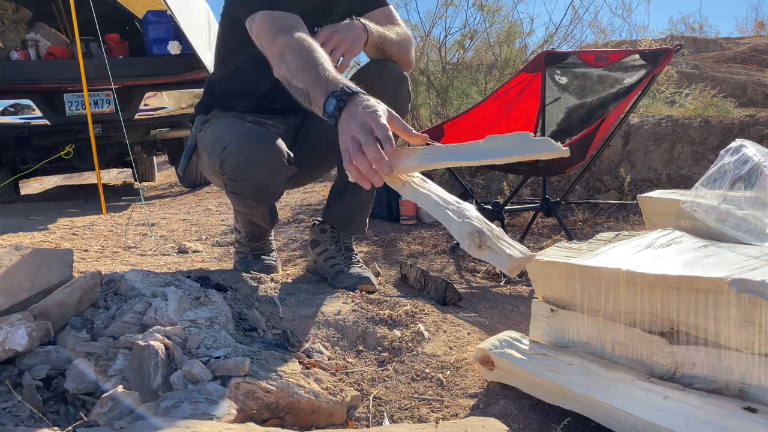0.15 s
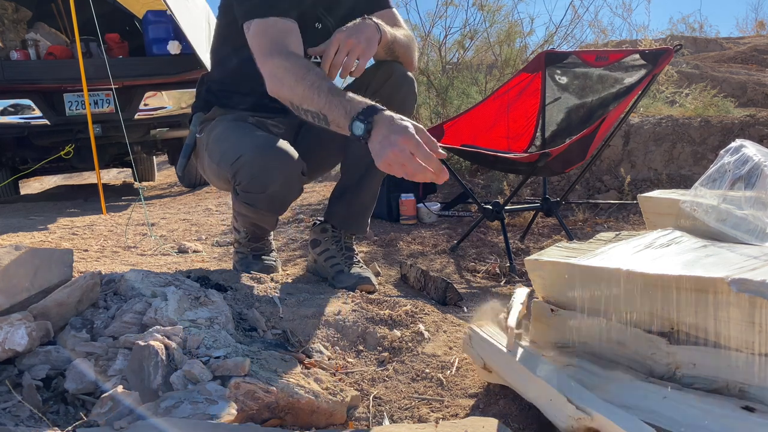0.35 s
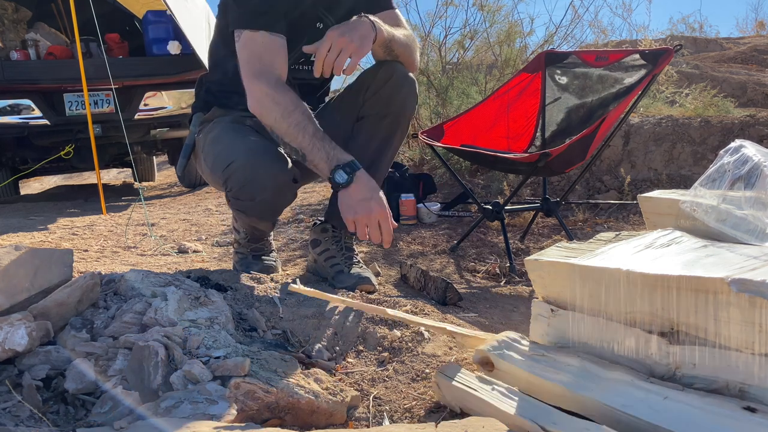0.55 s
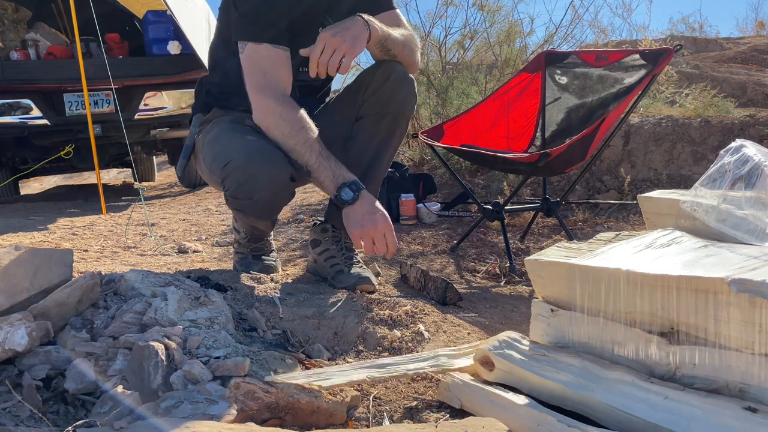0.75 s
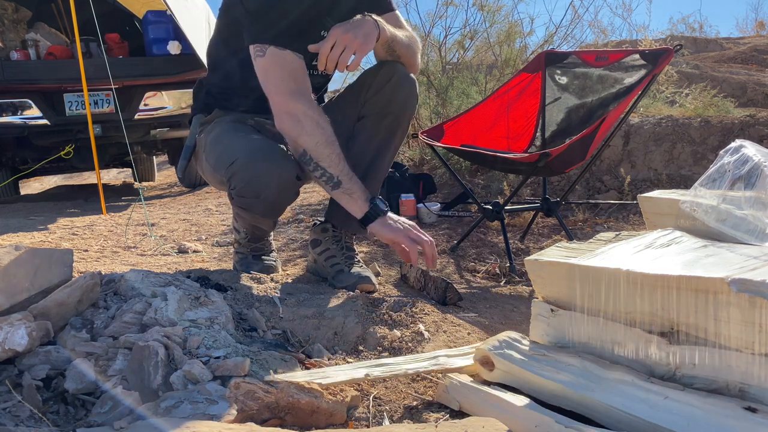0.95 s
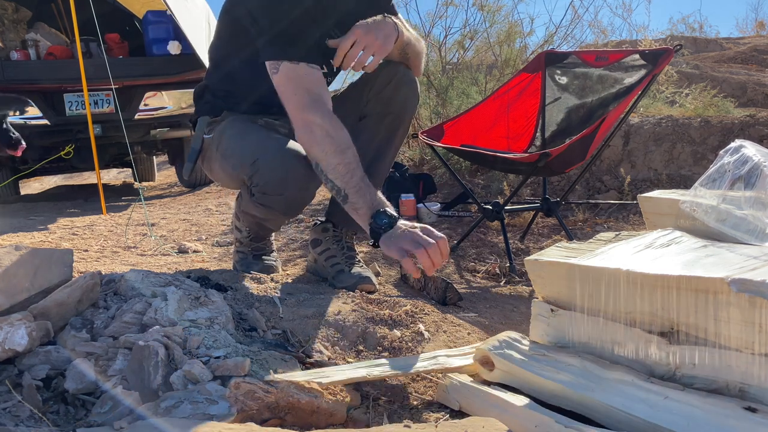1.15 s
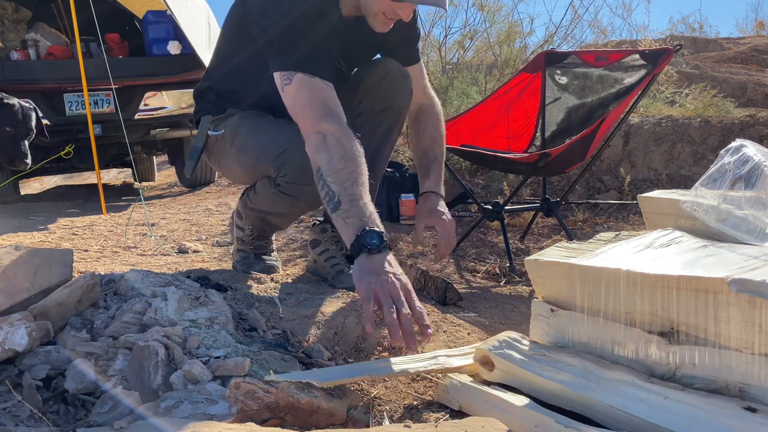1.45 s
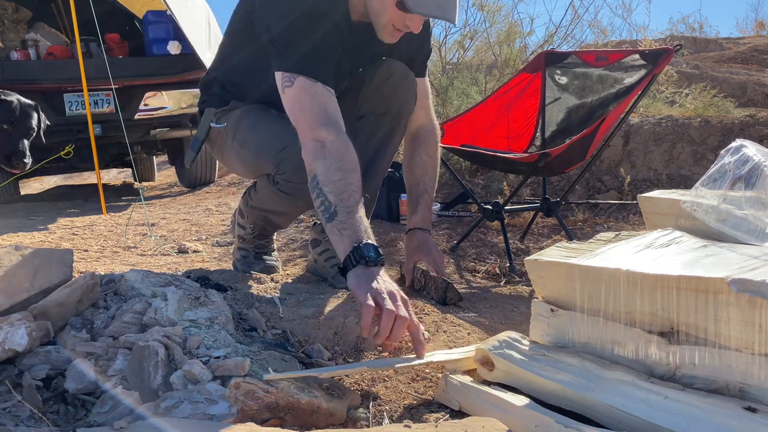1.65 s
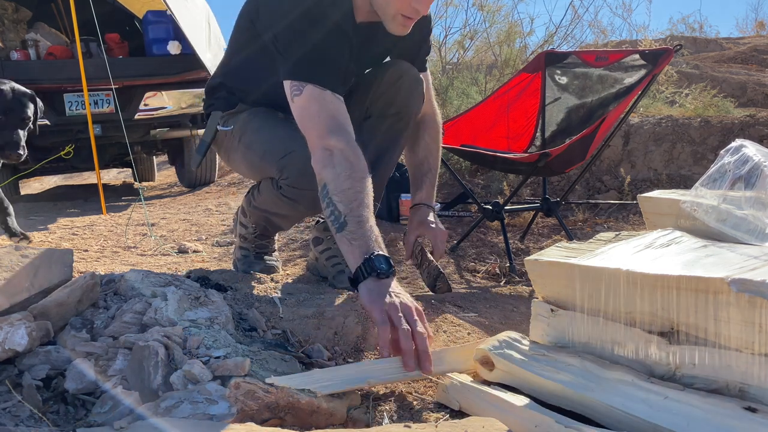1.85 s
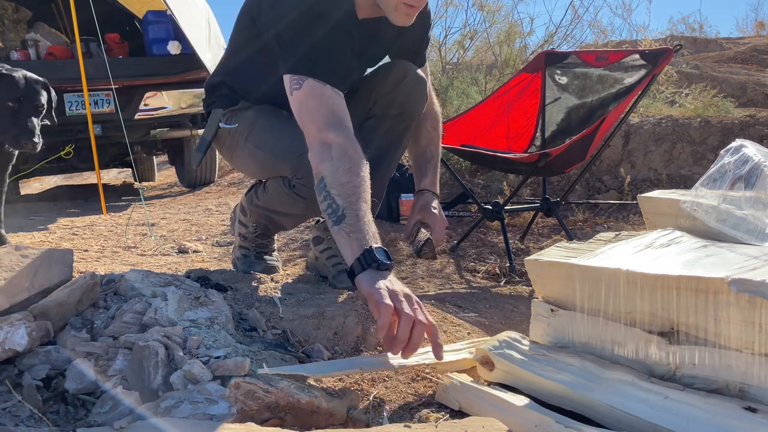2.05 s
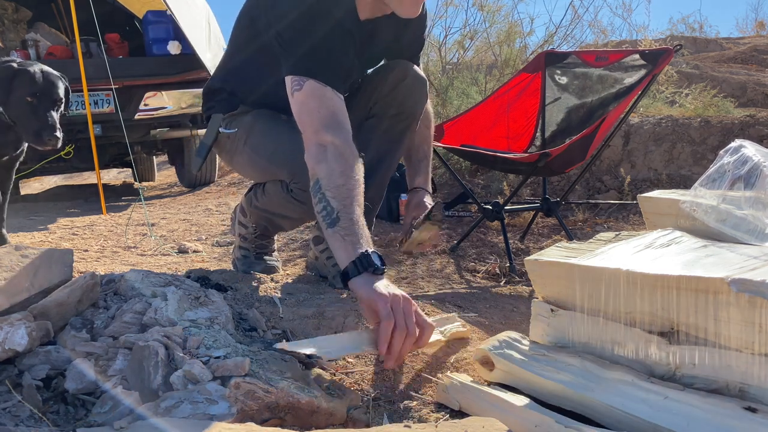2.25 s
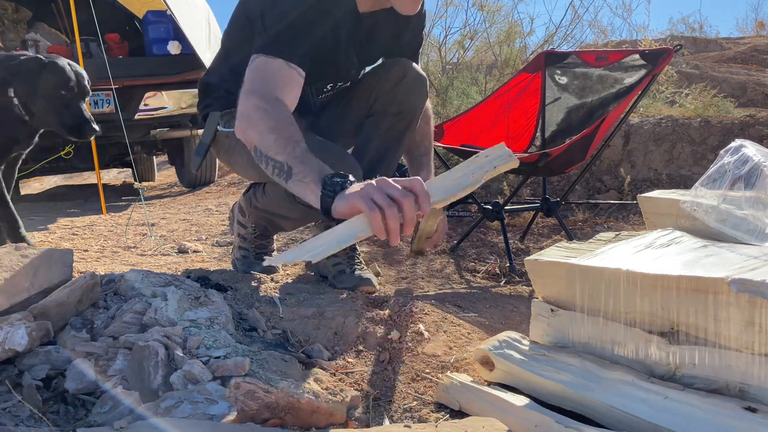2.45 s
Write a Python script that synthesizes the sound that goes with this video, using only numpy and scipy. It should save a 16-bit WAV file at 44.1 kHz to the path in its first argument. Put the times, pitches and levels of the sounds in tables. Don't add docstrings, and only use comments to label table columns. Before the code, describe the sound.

Sharp wooden cracks as firwood sticks drop on stacked firewood, settle, then drag across gritty ground

```python
import sys
import numpy as np
from scipy import signal
from scipy.fft import rfft, irfft
from scipy.io import wavfile
from scipy.ndimage import uniform_filter1d

SR = 44100
rng = np.random.default_rng(int(sys.argv[2]) if len(sys.argv) > 2 else 0)


def dump_mix(stems):
    frames = np.atleast_2d(stems).T
    limited = np.clip(frames, -1, 1)
    pcm = np.round(limited * 32767).astype(np.int16)
    wavfile.write(sys.argv[1], SR, pcm)


def elevation(decibels):
    levels = np.asarray(decibels, float)
    return 10 ** (levels / 20)


N = 114660

# frequency in Hz, phase in radians.
PORTS_TOP = [(9300, 3.1), (10600, 0), (12000, 0), (13300, -3.1), (15900, -6.3)]


def read(points, hz):
    f, value = np.transpose(points)
    return np.interp(np.log(hz + 1), np.log(f + 1), value)


def over_time(points):
    return np.interp(np.arange(N) / SR, *np.transpose(points))


def evened(x):
    return x / np.sqrt(np.mean(x ** 2) + 1e-20)


def add(mix, s, sound):
    part = mix[round(s * SR):][:len(sound)]
    part += sound[:len(part)]


def coloured(x, gain):
    return irfft(rfft(x) * gain(np.fft.rfftfreq(x.shape[-1], 1 / SR)), x.shape[-1])


def band(x, hz, focus):
    return signal.lfilter(*signal.iirpeak(hz, focus, fs=SR), x)


def hiss(spectrum, patchy_db, flicker_db, same_low, same_high):
    frames, hz = N // 128 + 5, np.fft.rfftfreq(512, 1 / SR)
    a, b, c, d, patches = rng.standard_normal((frames, 257, 5)).T
    patches = evened(uniform_filter1d(uniform_filter1d(patches, 6, 0), 16, 1))
    flicker = evened(uniform_filter1d(rng.standard_normal(frames), 4))
    same = read([(300, same_low), (4000, same_high)], hz)[:, None]
    left = a + 1j * b
    right = same * left + np.sqrt(1 - same ** 2) * (c + 1j * d)
    z = np.array([left, right]) * elevation(patchy_db * patches + flicker_db * flicker)
    noise = signal.istft(z, nperseg=512, noverlap=384)[1][:, :N]
    return evened(coloured(noise, lambda f: elevation(read(spectrum, f))))


def grains(count, size):
    grain_db, grains_per_s, clump_db = 2.2, 20000, 2.2
    strength = elevation(grain_db * np.minimum(rng.exponential(1, (count, size)), 4))
    z = rng.standard_normal((count, size)) * strength
    clumps = elevation(clump_db * evened(uniform_filter1d(rng.standard_normal((count, size)), size=120)))
    slipping = rng.random((count, size)) < grains_per_s / SR
    return evened(z * clumps * (0.067 + slipping))


def contact(length, rise, slips):
    u = np.arange(len(slips)) / SR / max(length, .001)
    return slips * np.minimum(u / rise, 1) * np.exp(-2.5 * u ** 3)


def ring(modes, damping):
    t = np.arange(SR // 3) / SR
    h = sum(elevation(db - 60 * damping * t / t60) * np.sin(2 * np.pi * hz * t) for hz, db, t60 in modes)
    return h / np.linalg.norm(h)


def mottled(grit):
    mottle_db = 3.8
    hz, t, z = signal.stft(grit, SR, nperseg=128)
    patches = uniform_filter1d(rng.standard_normal(z.shape), size=3, axis=0)
    patches = evened(uniform_filter1d(patches, size=4, axis=1))
    return signal.istft(z * elevation(mottle_db * patches), SR, nperseg=128)[1][:N]


def stick(rows, modes, rise, damping, blow):
    # frequency in Hz, level in dB per Hz.
    grit_colour = [(150, -40.5), (300, -17.5), (2630, -7.5), (5000, -6.5), (10000, -12), (13500, -15.5),
                   (15500, -14.5)]
    focus, patch_db = 1.91, -6
    force, grit = np.zeros((2, N))
    for (s, length, ring_db, hz, grit_db), slips in zip(rows, grains(count=len(rows), size=6000)):
        touch = contact(length, rise, slips)
        peak = np.arange(len(slips)) == round(rise * length * SR)
        strike = blow * np.sqrt(length * SR) * peak
        add(force, s, elevation(ring_db + 3.0) * band(band(touch + strike, hz, focus), hz, 0.77))
        add(grit, s, elevation(grit_db) * (touch + elevation(patch_db) * band(touch, hz, focus)))
    ringing = signal.fftconvolve(force, ring(modes, damping))[:N]
    return ringing + coloured(mottled(grit), lambda f: evened(elevation(read(grit_colour, f))))


def knocks(rows):
    rise_s, rough = 0.0004, .3
    out, t = np.zeros(N), np.arange(SR // 5) / SR
    for (s, db, hz, t60), fibres in zip(rows, rng.standard_normal((len(rows), len(t)))):
        tone = np.sin(2 * np.pi * hz * t) + rough * evened(band(fibres, hz, 4.))
        add(out, s, elevation(db - 60 * t / t60) * (1 - np.exp(-(t / rise_s) ** 2)) * tone)
    return out


def ports(x, phase, tilt):
    scatter_db, scatter_t60, scatter_top_hz = -6.5, 0.03, 5955
    pair = np.array([coloured(x, lambda hz: elevation(side * read(tilt, hz)) * np.exp(1j * side * read(phase, hz)))
                     for side in (.5, -.5)])
    t = np.arange(SR // 8) / SR
    tail = rng.standard_normal((2, len(t))) * elevation(-60 * t / scatter_t60) * np.minimum(t / 0.002, 1)
    tail = signal.lfilter(*signal.butter(1, scatter_top_hz, fs=SR), tail + 3.3 * tail[::-1])
    scatter = signal.fftconvolve(pair, tail / np.linalg.norm(tail[0]), axes=1)[:, :N]
    return pair + elevation(scatter_db) * scatter


def wind():
    # frequency in Hz, level in dB per Hz.
    air_colour = [(15, -36), (60, -11), (150, -15), (260, -25), (700, -38), (16200, -71.5)]
    # time in seconds, level in dB.
    gusts = [(0, 4.5), (.7, 6.5), (1.02, 0.5), (1.2, -6), (1.6, 5), (2.5, -5.5)]
    return elevation(-53 + over_time(gusts)) * hiss(air_colour, 2.0, 0.51, 0.79, 0.24)


def cloth():
    # time in seconds, level in dB.
    movement = [(0, -57), (.1, -52.5), (.16, -54), (.32, -60), (.55, -58), (.85, -55.5), (.88, -69.5),
                (.95, -57.5), (1.07, -70), (1.14, -48.5), (1.23, -51), (1.28, -71.5), (1.38, -75),
                (1.5, -64), (1.99, -50.5), (2.03, -67.5), (2.3, -52.5), (2.5, -59)]
    # frequency in Hz, level in dB per Hz.
    cloth_colour = [(200, -40.5), (1000, -27.5), (1900, -12.5), (3500, -8), (7000, -13.5), (10500, -16.5),
                    (15500, -17)]
    return elevation(over_time(movement)) * hiss(cloth_colour, 3.2, 2.0, .3, .2)


def sleeve():
    # time in seconds, level in dB.
    rubbing = [(0, -49), (.1, -50.5), (0.202, -81.5), (.86, -75), (.92, -56.5), (1.101, -66), (1.23, -69),
               (1.3, -85)]
    hz = 1900
    rub = band(band(grains(count=1, size=N)[0], hz, 4.), hz, 3.)
    return elevation(over_time(rubbing)) * evened(rub)


def thin_stick():
    # frequency in Hz, level in dB, t60 in seconds.
    thin_modes = [(740, 5.5, 0.35), (877, -2, 0.19), (1019, -17.5, 0.019), (1677, -4.5, 0.13),
                  (2200, -7.5, 0.01), (2920, 1, 0.012), (2960, -3, 0.09), (3600, -4.5, 0.052),
                  (4603, -7.5, 0.014)]
    # start in seconds, contact in seconds,
    # ring in dB, loudest region in Hz, grit in dB.
    free_tap = [
        (.105, 0.0066, -20, 1700, -24),
    ]
    # start in seconds, contact in seconds, ring in dB,
    # loudest region in Hz, grit in dB.
    bounces = [(.173, 0.005, -55, 2950, -42.5), (.184, 0.0057, -53, 3000, -43),
               (.190, 0.015, -43, 3250, -34), (.407, 0.0063, -40, 1940, -35.5),
               (.414, .006, -12, 2310, -21), (.585, 0.0083, -21.5, 2220, -16.5),
               (.614, 0.01052, -33, 1930, -40), (.681, 0.022, -62, 4090, -44),
               (.712, 0.013, -26.5, 2020, -25), (.728, 0.0068, -21, 1840, -29),
               (.766, 0.024, -41, 1370, -42), (.803, 0.0046, -46.5, 3800, -52.5),
               (.821, 0.0063, -33, 1660, -48), (.834, 0.0053, -48.5, 4110, -27),
               (.940, 0.0056, -35, 1760, -69), (.976, 0.0032, -37, 2060, -37),
               (1.508, 0.02, -48, 1083, -43.5), (1.670, 0.031, -49.5, 1010, -55),
               (1.733, 0.0086, -38, 3100, -45.5), (2.109, 0.017, -24, 1840, -27.5)]
    # start in seconds, length in seconds, grit in dB, loudest region in Hz.
    scrapes = [(.445, .02, -43.5, 3800), (0.629, 0.018, -47.5, 4040), (1.426, 0.0022, -45, 2930),
               (1.448, 0.0072, -42, 1835), (1.48, 0.036, -45, 2940), (1.569, 0.0099, -51, 2900),
               (1.638, 0.017, -38, 2300), (1.647, 0.06, -46.5, 4440), (1.779, 0.015, -44.5, 5970),
               (1.789, 0.025, -34.5, 2080), (1.843, 0.0048, -40.5, 5500), (1.857, 0.018, -20.5, 2330),
               (1.872, .015, -16.5, 1770), (1.88, 0.023, -20, 2530), (1.898, 0.022, -30, 2140),
               (1.905, 0.043, -32, 2390), (1.938, .055, -35, 3050), (2.048, 0.065, -38, 4400),
               (2.094, 0.011, -37.5, 4400), (2.137, 0.057, -40, 2540), (2.168, .02, -39.5, 3350),
               (2.221, 0.014, -30.5, 3100), (2.224, 0.042, -38.5, 2900), (2.406, 0.057, -45, 3210),
               (2.561, 0.078, -46, 3060)]
    grounded_db = -8
    lying = [(hz, db + grounded_db * (k == 0), t60) for k, (hz, db, t60) in enumerate(thin_modes)]
    drags = [(s, length, db, hz, db) for s, length, db, hz in scrapes]
    tapped = stick(free_tap, thin_modes, .45, 1., .8)
    bounced = stick(bounces, lying, .5, 1.7, .4)
    return tapped + bounced + stick(drags, lying, 0.4, 1.59, 0)


def ground_knocks():
    # start in seconds, peak in dB, pitch in Hz, t60 in seconds.
    spots = [(.107, -24, 2110, 0.038), (.108, -14.5, 3537, 0.024), (.1735, -31.5, 2770, .045),
             (.1845, -20.5, 2960, .025), (.194, -32.5, 3005, 0.052), (.416, -24, 1990, 0.026),
             (.6145, -31, 2010, .03), (.650, -44.5, 1550, 0.07), (.682, -33, 380, 0.023),
             (.714, -23.5, 2300, 0.028), (.767, -35, 740, 0.042), (.780, -37, 703, 0.032),
             (2.037, -52, 2310, .03), (2.056, -38, 838, 0.045), (2.058, -40.5, 1674, 0.16),
             (2.096, -34.5, 1662, 0.12), (2.112, -21, 3100, .03), (2.122, -34, 659, .03),
             (2.154, -42.5, 2200, 0.041), (2.172, -34.5, 3860, 0.022), (2.175, -36.5, 800, 0.057),
             (2.213, -32, 3080, .03), (2.222, -25.5, 2648, 0.046), (2.248, -33, 2700, .03)]
    return knocks(spots)


def thick_stick():
    # start in seconds, contact in seconds, ring in dB, loudest region in Hz, grit in dB.
    blows = [(.233, 0.02, -37.5, 2150, -14.5), (.243, 0.0046, -28.5, 1890, -24),
             (.247, .009, -19.5, 1760, -17.5), (.2665, 0.011, -3, 1130, -2.5),
             (.2995, .0045, 2.5, 1210, -11.5), (.309, 0.017, -11, 1990, -27.5),
             (.345, 0.015, -34, 800, -32), (.361, 0.011, -38.5, 930, -39.5),
             (.375, 0.0043, -33, 2347, -35.5), (.391, 0.0087, -40.5, 1110, -43),
             (.470, 0.014, -37.5, 2010, -25.5), (.497, 0.015, -50.5, 2000, -44.5)]
    # frequency in Hz, level in dB, t60 in seconds.
    thick_modes = [(707.5, -4, 0.12), (846, -16, 0.042), (1005, -5.5, 0.03), (1087.7, -6.5, 0.053),
                   (1160, 6, .025), (1386, -15, .03), (1520, -5.5, 0.085), (1790, -14.5, .025),
                   (1983, -6.5, 0.061), (2830, -14, .03), (3300, -15.5, .025), (4400, -12, .022)]
    return stick(blows, thick_modes, .25, 1.0, 0.77)


def pile_knocks():
    # start in seconds, peak in dB, pitch in Hz, t60 in seconds.
    spots = [(.2355, -12.5, 1930, 0.029), (.2435, -9.5, 1880, 0.028), (.249, -7, 1760, 0.033),
             (.2545, -23, 650, 0.15), (.2705, -8.5, 2100, .03), (.3005, -2, 2050, 0.047),
             (.308, -12, 1983, 0.09), (.312, -22.5, 560, .06), (.358, -33, 900, 0.037),
             (.374, -21.5, 2400, 0.012), (.392, -32.5, 1120, 0.063), (.4695, -26, 1900, 0.027),
             (.4765, -26.5, 2008, 0.054), (.478, -34.5, 1561, 0.036), (.502, -37.5, 2010, 0.034)]
    return knocks(spots)


def thuds():
    # start in seconds, level in dB, pitch in Hz.
    bumps = [(0.264, -13.5, 170.7), (0.301, -18, 357), (0.357, -32.5, 241.4), (0.476, -34, 218),
             (0.589, -29.5, 285), (.652, -40.5, 248), (1.551, -35, 57.3), (1.735, -34.5, 56.3),
             (1.79, -41, 641), (1.867, -33, 358), (2.096, -37.5, 546)]
    cycles, base_s, soil_hz = 6, 0.075, 200
    out, t = np.zeros(N), np.arange(SR // 4) / SR
    for (s, db, hz), soil in zip(bumps, rng.standard_normal((len(bumps), len(t)))):
        crumble = evened(band(band(soil, hz, 0.74), hz, 0.74))
        push = np.sin(2 * np.pi * hz * t) + 1.2 * min(hz / soil_hz, 1) * crumble
        add(out, s, elevation(db - 60 * t / (base_s + cycles / hz)) * push * np.minimum(t * hz, 1))
    return out


def ticks():
    # start in seconds, peak in dB, pitch in Hz, t60 in seconds.
    specks = [
        (.2672, -10, 7900, 0.0077),
        (.530, -41, 4000, .006),
        (.8355, -32, 6570, 0.0041),
        (.976, -44, 8000, .004),
        (1.506, -45.5, 923, .1),
        (1.668, -43.5, 922, 0.14),
        (1.862, -24.5, 1600, 0.027),
        (1.866, -20, 863, .05),
        (1.875, -24.5, 1450, 0.021),
        (2.110, -36, 1710, 0.12),
    ]
    return knocks(specks)


def scene():
    # frequency in Hz, phase in radians.
    pile_phase = [(300, 0), (1900, -.8), (2760, -2.7), (3700, -1.9), (5900, -3.2), (6500, .5)] + PORTS_TOP
    ground_phase = [(1100, -.2), (3200, 1.5), (4600, .4), (6700, 6.5)] + PORTS_TOP
    # frequency in Hz, left over right in dB.
    pile_tilt = [(400, 4.5), (800, -7), (2400, 6), (12000, -1.5)]
    ground_tilt = [(300, 2.5), (12000, .3)]
    rustle = cloth()
    pile = thick_stick() + pile_knocks()
    ground = thin_stick() + rustle[0] + ground_knocks() + sleeve() + ticks()
    mix = ports(pile, pile_phase, pile_tilt) + ports(ground, ground_phase, ground_tilt)
    return mix + thuds() + wind() + 0.61 * rustle[1]


def low_pass(x):
    return signal.sosfilt(signal.butter(12, 16390, fs=SR, output="sos"), x)


def record(dry):
    # frequency in Hz, width in Hz, depth in dB.
    dips = [(9200, 450, -7), (13500, 600, -9)]
    x = coloured(dry, lambda f: elevation(sum(db * np.exp(-((f - hz) / width) ** 2) for hz, width, db in dips)))
    x = np.clip(x, -1.0, 1.0)
    edge = signal.firwin(255, 16300, window=("kaiser", 7), fs=SR)
    x = signal.oaconvolve(x, edge[None], "same")
    return low_pass(x)


dry = scene()
out = record(dry)
dump_mix(out)
```